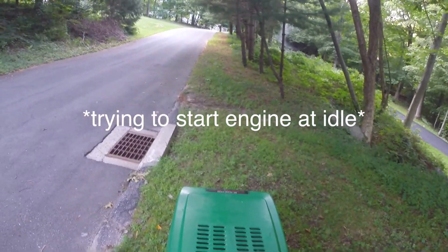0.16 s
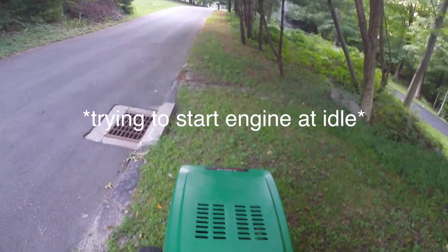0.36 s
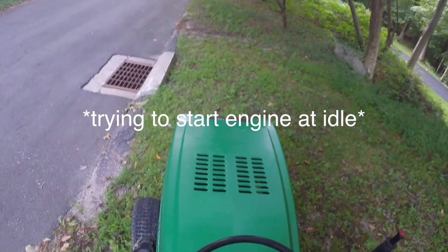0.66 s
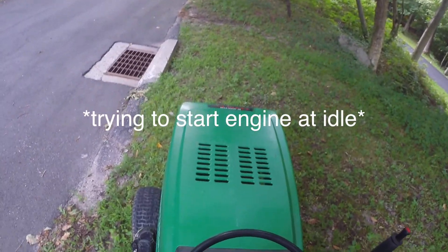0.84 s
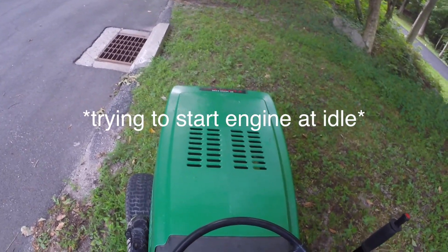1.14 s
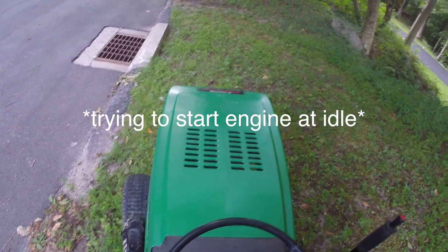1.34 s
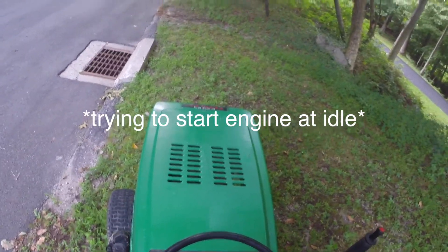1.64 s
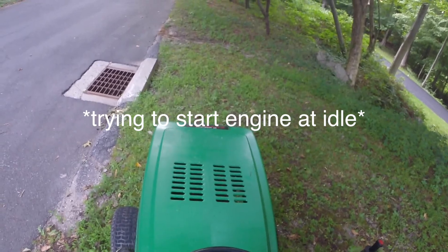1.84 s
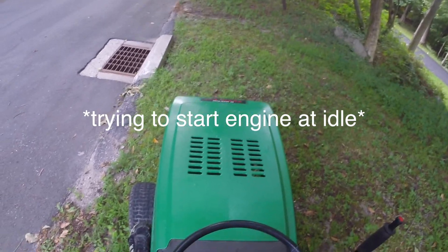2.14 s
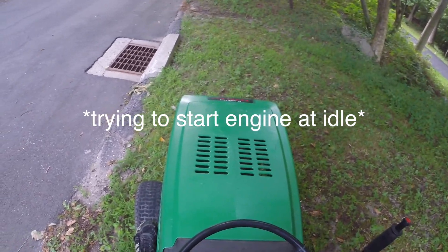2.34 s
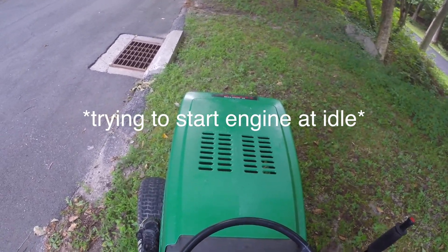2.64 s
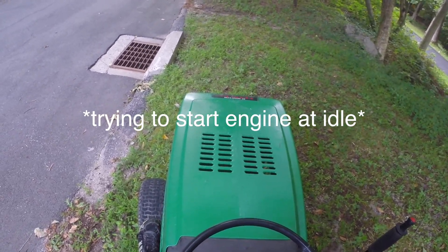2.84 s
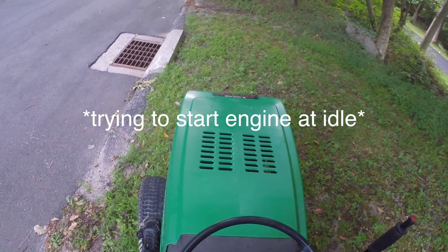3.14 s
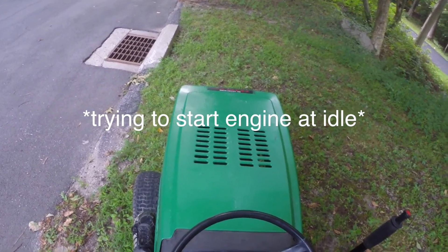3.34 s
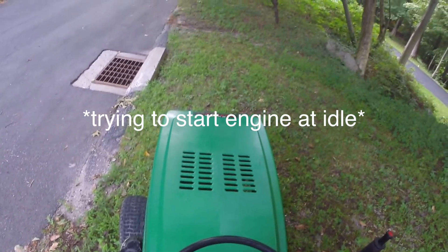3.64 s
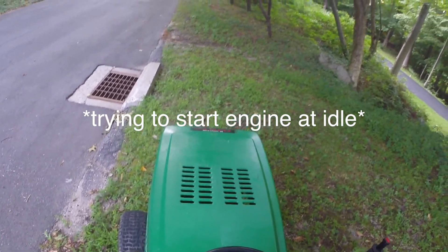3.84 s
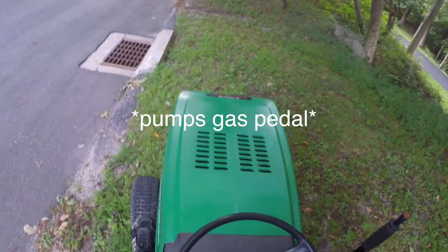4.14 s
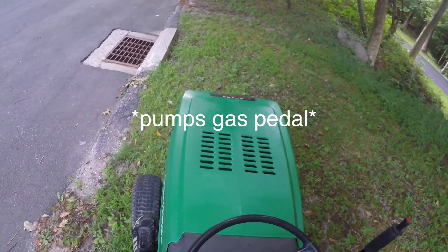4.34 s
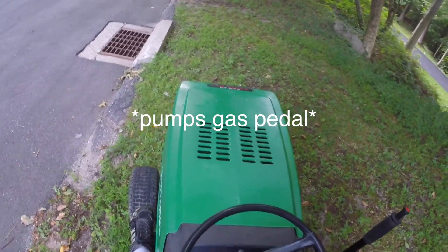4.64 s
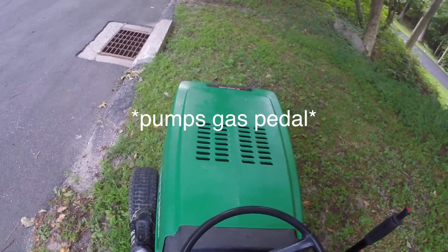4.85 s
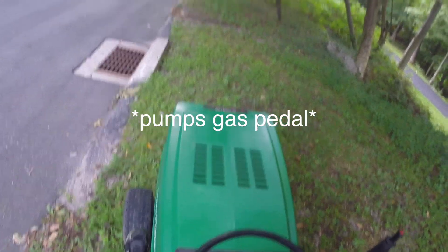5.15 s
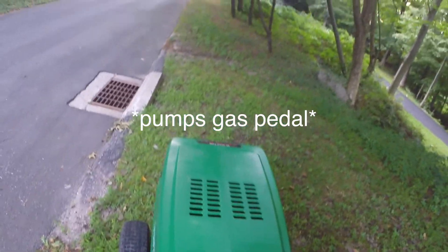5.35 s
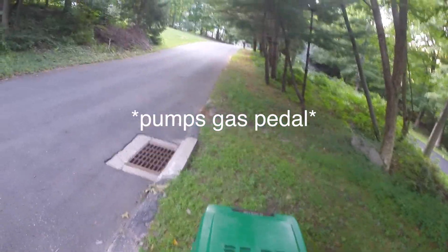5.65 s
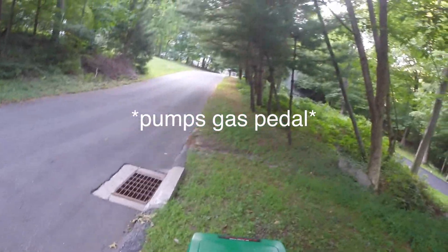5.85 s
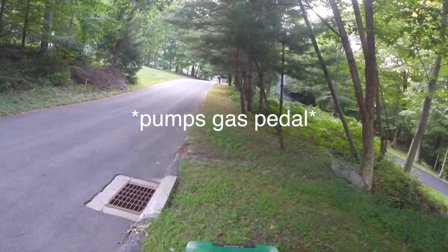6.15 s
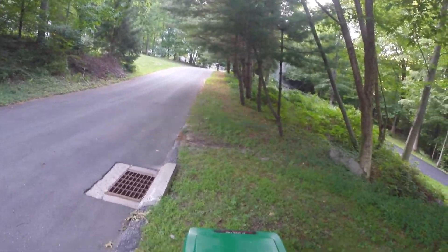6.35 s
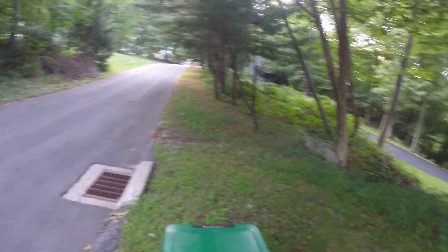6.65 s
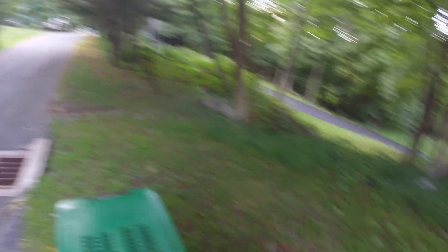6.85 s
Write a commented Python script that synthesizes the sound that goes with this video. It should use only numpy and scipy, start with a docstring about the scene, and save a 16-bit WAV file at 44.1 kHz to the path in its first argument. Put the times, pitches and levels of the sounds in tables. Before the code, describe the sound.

Heard from the seat of a lawn tractor outdoors: an engine turn with a chirp, puff and gulp dies away in soft clatter. A few clicks, then the starter bangs in with a rising whine and grinding teeth. Rhythmic chirps and hollow puffs follow, slow down briefly, then the engine catches with a clank and fires in uneven, accelerating thumps. Faint low rumble and bird behind.

```python
"""A one-cylinder lawn tractor outdoors, heard from the seat, with a faint far bird and a low rumble behind it.
First the engine turns over once, with a chirp, a puff and gulps, and its clatter dies away.
After a few clicks the starter bangs in and whines up to speed, its gear teeth and brushes made of shaped noise.
It turns the engine: each turn is a chirp of squeezed air and a ringing exhaust puff, with intake gulps between.
Then the engine catches and fires in uneven, quickening surges of thumps, muffler rings and rough gas noise."""
import sys
import numpy as np
from scipy import signal
from scipy.fft import rfft, irfft
from scipy.io import wavfile

SR = 44100
rng = np.random.default_rng(int(sys.argv[2]) if len(sys.argv) > 2 else 0)


def dump(signal):
    """Clip the signal to [-1, 1] and save it as 16-bit WAV at the path in sys.argv[1]."""
    limited = np.clip(np.atleast_2d(signal).T, -1, 1)
    pcm = np.round(limited * 32767).astype(np.int16)
    wavfile.write(sys.argv[1], SR, pcm)


N = 308700
TIME = np.arange(N) / SR  # seconds
AGE = np.arange(-SR // 50, SR // 4) / SR  # seconds since an event, from just before it


def amp(db):
    """Turns decibels into a gain."""
    return 10 ** (np.asarray(db) / 20)


def unit(x):
    """Scales a sound to an average (rms) strength of 1."""
    return x / np.sqrt(np.mean(x ** 2) + 1e-20)


def add(mix, s, sound):
    """Mixes in a sound laid out on AGE, at time s."""
    start = max(round((s + AGE[0]) * SR), 0)
    part = mix[start:][:len(sound)]
    part += sound[:len(part)]


def level(rows, column):
    """Gain over time from a column of decibels, practically silent outside its span."""
    rows = np.array(rows)
    return amp(np.interp(TIME, rows[:, 0], rows[:, column], left=-150, right=-150))


def colour(x, points):
    """Gives a sound a spectrum that falls steeply beyond its ends, with rms 1."""
    hz, db = np.transpose(points)
    f = np.fft.rfftfreq(len(x), 1 / SR) + 1  # the 1 avoids the logarithm of zero
    skirts = np.minimum(f / hz[0], 1) ** 3 * np.minimum(hz[-1] / f, 1) ** 4
    curve = amp(np.interp(np.log(f), np.log(hz), db))
    return unit(irfft(rfft(x) * skirts * curve, len(x)))


def noise(points, size=len(AGE)):
    """Makes random noise with a chosen spectrum."""
    return colour(rng.standard_normal(size), points)


def drift(rate_hz, size=N):
    """Makes a random wander of rms 1, with little movement faster than rate_hz."""
    f = np.fft.rfftfreq(size, 1 / SR)
    return unit(irfft(rfft(rng.standard_normal(size)) / (1 + (f / rate_hz) ** 4), size))


def bump(at, width):
    """One smooth swell of pressure."""
    return np.exp(-.5 * ((AGE - at) / width) ** 2)


def burst(rise, decay, delay=0):
    """Loudness shape of a blow: a quick rise and a fading tail, peak 1."""
    t = np.maximum(AGE - delay, 0)
    shape = (1 - np.exp(-t / rise)) * np.exp(-t / decay)
    return shape / shape.max()


def ring(hz, t60, delay=0):
    """A struck tone that falls by 60 dB in t60 seconds."""
    t = np.maximum(AGE - delay, 0)
    return np.sin(2 * np.pi * hz * t) * np.exp(-np.log(1000) * t / t60)


# ringing tones of the hood and frame: (pitch_hz, width_hz, level_db over the plain sound)
PANELS = [(368, 26, -7), (863, 5.8, 2.5), (942.5, 7.5, 0), (1119.5, 15, 0), (1606, 26, -1.5),
          (1876, 34, -1), (2009, 24, 2), (2800, 14, -3.5)]


def hood(x, modes=PANELS):
    """Sheet metal rings along, at its own pitches, with whatever shakes it."""
    out = x.copy()
    for hz, width, db in modes:
        out += amp(db) * signal.lfilter(*signal.iirpeak(hz, hz / width, fs=SR), x)
    return out


# spectrum of the open air: (pitch_hz, level_db relative to the other points)
AIR = [(15, -39), (25, 1), (55, -3.5), (96, -2.5), (133, 5), (152, -10), (183, -7.5), (274, -11.5),
       (4150, -33), (4870, -26), (8130, -41.5), (10100, -35.5), (10900, -47), (13500, -43), (15500, -47)]
AIR_DB = -47.5
# distant hum and high buzz: (pitch_hz, width_hz, level_db)
WHISTLES = [(135, 74, -60), (4970, 260, -72.5)]
# whistles of a far bird: (start_s, length_s, top_pitch_hz before a small waver, level_db)
BIRD = [(1.04, 0.15, 9000, -66), (1.2, .13, 8650, -65), (1.87, .1, 9850, -64), (4.918, 0.19, 8700, -59),
        (5.145, 0.14, 8650, -61.5)]
THIN_TONE_HZ, THIN_TONE_DB = 13905, -74.5


def outdoors():
    """Noise makes a low distant rumble; sines make a thin steady tone, a hum, a buzz and a far bird."""
    thin_tone = unit(np.sin(2 * np.pi * THIN_TONE_HZ * TIME + drift(4)))
    out = amp(AIR_DB) * noise(AIR, size=N) + amp(THIN_TONE_DB) * thin_tone
    for hz, width, db in WHISTLES:
        # a randomly wavering strength spreads each tone into a narrow band
        out += amp(db) * unit(drift(width / 2) * np.sin(2 * np.pi * hz * TIME))
    for s, length, hz, db in BIRD:
        arch = np.sin(np.pi * np.clip((TIME - s) / length, 0, 1))
        pitch = hz * (.94 + .06 * arch + .012 * drift(200))
        out += amp(db) * arch * np.sin(2 * np.pi * np.cumsum(pitch) / SR)
    return out


def surroundings(x, wet_db=-24, decay=0.059):
    """The ground and the trees scatter back a weak, short tail of the sound."""
    tail = noise([(100, 1.0), (600, 8.5), (3000, -8), (10000, -57)]) * burst(0.0029, decay)
    tail = tail[AGE >= 0]
    return x + amp(wet_db) * signal.oaconvolve(x, tail / np.linalg.norm(tail))[:N]


# clatter as the engine runs down and as it starts again, two lists of:
# (time_s, body_db, treble_db), both levels relative
CLATTER = [
    [(0.0, -29, -39), (0.3, -31, -47), (0.458, -41, -60), (0.62, -40.5, -71), (0.85, -75, -62)],
    [(1.97, -52, -64), (2.12, -25.5, -23), (2.35, -25.5, -28), (2.9, -21, -29.5), (3.15, -23, -34),
     (4.15, -27, -38), (4.72, -31, -45), (5.2, -24, -35), (5.5, -24.5, -31), (7.0, -25, -34)],
]
# spectra of the body and the treble: (pitch_hz, level_db relative)
BODY_COLOUR = [(150, -21.5), (250, -4.5), (370, -2.5), (520, -7.5), (720, -4), (860, -5), (1000, -7),
               (1170, -11.5), (1300, -21.5), (1700, -20.5)]
TREBLE_COLOUR = [(710, 7.5), (1200, -2), (1360, -7), (1940, -8.5), (2650, -13), (3010, -11), (3770, -12.5),
                 (4070, -13.5), (5090, -21.5), (5790, -28), (6730, -25.5), (7250, -28), (8330, -35.5),
                 (14400, -53), (15500, -57)]


def clatter(taps_per_s=200, spread_db=1.0, flutter_db=1.5):
    """Valve gear, belt and loose panels: uneven random taps, each a brief burst in the sheet metal."""
    strength_db = spread_db * np.minimum(rng.exponential(1, N), 3)
    energy = (rng.random(N) < taps_per_s / SR) * amp(strength_db) ** 2
    wash = .4  # steady noise between the taps

    def taps(decay):
        """Noise that swells with every tap and fades after it."""
        power = signal.oaconvolve(energy, burst(0.00029, decay)[AGE >= 0] ** 2)[:N]
        envelope = unit(np.sqrt(abs(power)))
        return (envelope + wash) * rng.standard_normal(N)

    body = colour(taps(0.012), BODY_COLOUR) * sum(level(rows, column=1) for rows in CLATTER)
    treble = colour(taps(0.013), TREBLE_COLOUR) * sum(level(rows, column=2) for rows in CLATTER)
    return hood(amp(-4.5) * body + amp(2.0) * treble) * amp(flutter_db * drift(16.3))


# clicks of the controls and clanks of the drive:
# (start_s, body_db, treble_db, decay_s), levels relative; body and crack each scale the decay
CLANKS = [(0.114, -15, -44, 0.0051), (0.303, -18, -37, 0.0054), (0.461, -23.5, -52, 0.026),
          (0.493, -30, -39, 0.0093), (0.528, -17.5, -54, 0.015), (1.205, -29, -39, 0.023),
          (1.489, -20, -33.5, 0.0076), (1.552, -25, -38.5, 0.0054), (1.61, -28.5, -67, 0.0029),
          (1.849, -59, -47.5, 0.011), (1.95, -13.5, -33, 0.033), (1.976, -2, -21.5, 0.031),
          (2.058, -8, -49, 0.11), (3.062, -6.5, -27, 0.0085), (4.338, -34, -36, 0.008),
          (4.695, -14, -54, 0.0068), (4.727, -12.5, -54, 0.011), (4.916, -12, -44, 0.016),
          (5.033, -21, -36, 0.03), (5.478, 2.5, -36, 0.011), (5.583, -7.5, -31, 0.018),
          (6.105, -5, -34, 0.015)]
# spectra of struck metal and of bright hiss: (pitch_hz, level_db relative)
CLANK_COLOUR = [(150, -29), (250, -1), (350, -3.5), (550, -2), (720, 3), (1130, -1.5), (1350, -10),
                (2150, -16), (3200, -23.5)]
HISS_COLOUR = [(900, -2), (2000, 5.5), (3200, 2.5), (4100, 0), (5200, -7.5), (7200, -5.5), (9000, -17.5),
               (15000, -28.5)]


def clanks():
    """Metal meets metal: two noise bursts, a bright crack and a longer body, ring the frame."""
    out = np.zeros(N)
    for s, body_db, treble_db, decay in CLANKS:
        body = amp(body_db - 11.5) * noise(CLANK_COLOUR) * burst(0.0006, 1.5 * decay)
        crack = amp(treble_db - 2.0) * noise(HISS_COLOUR) * burst(0.00096, .5 * decay)
        add(out, s, body + crack)
    return hood(out)


# the starter takes up the load and shakes the frame: (start_s, level_db, decay_s)
ENGAGE = [(1.981, -13.5, 0.038)]
# spectrum of the shaken frame: (pitch_hz, level_db relative)
FRAME_COLOUR = [(120, -8.5), (250, -3.5), (350, 0.5), (450, -1), (540, 4), (700, -10)]


def engage():
    """A burst of low noise: a dull, heavy shudder of the frame."""
    out = np.zeros(N)
    for s, db, decay in ENGAGE:
        add(out, s, amp(db) * noise(FRAME_COLOUR) * burst(0.0028, decay))
    return out


# thin metal that rings at the first firing: (pitch_hz, width_hz, level_db)
SHIMMER = [(7050, 1100, -28.5), (12000, 760, -52)]
CATCH_S = 5.478


def ping(decay=0.016):
    """A short, bright shimmer of thin metal as the engine catches: narrow bands that fade at once."""
    out = np.zeros(N)
    for hz, width, db in SHIMMER:
        shimmer = drift(width / 2, size=len(AGE)) * np.sin(2 * np.pi * hz * AGE)
        add(out, CATCH_S, amp(db) * shimmer * burst(0.00071, decay))
    return out


# the starter winds up from its first pitch towards its top pitch; it fades once the key is let go
START_S, RELEASE_S = 1.98, 2.97
START_HZ, TOP_HZ, WIND_UP_S = 200, 1278, .5
WHINE_DB, WHINE_FALL_DB_PER_S = -22, 170  # base level, before load, torque and colour
TORQUE_DB = 7.5  # extra whine towards standstill, where the motor pulls hardest
PARTIALS_DB = [0.5, -3, -11, -12]  # the tooth note and its multiples: level_db relative
SLACK_FROM_HZ, SLACK_FULL_HZ = 800, 1000  # pitches between which the teeth begin to rattle
# the whine swells as the piston is pushed into each compression
LOAD_DB, LOAD_LEAD_S, LOAD_WIDTH_S = 3.5, 0.022, 0.028
FIRST_PUSH_S = 2.16  # the first, slow compression, too gentle to chirp
BRUSH_DB, BRUSH_DB_PER_OCTAVE = -24.5, 12.5  # at top speed, and how it follows the speed
BRUSH_FALL_DB_PER_S = 200
# the pinion grinds hardest while it drags the engine up to speed
GRIND_DB, GRIND_S, GRIND_RISE_S, GRIND_DECAY_S = -28.5, 2.12, 0.032, 0.39
# how well the starter radiates its whine: (pitch_hz, level_db)
WHINE_COLOUR = [(300, -31), (520, -19), (660, -6.5), (780, 6.5), (880, -7.5), (950, -4), (1100, -4.5),
                (1320, 3.5), (1450, -6.5), (1630, -4.5), (2000, -18), (2500, -27)]
# spectra of the grinding pinion and the brushes: (pitch_hz, level_db relative)
GRIND_COLOUR = [(750, -5), (1300, 7), (1950, 3), (2500, 0.5), (4100, -12), (5200, -13), (7500, -41),
                (12000, -61)]
BRUSH_COLOUR = [(760, -5.5), (1300, -2.5), (1460, -6), (2010, -9.5), (2600, -15.5), (2770, -14),
                (3240, -13.5), (3980, -13), (4700, -16.5), (7740, -18), (11100, -33.5), (12700, -43),
                (15500, -45)]
# ringing tones of the starter's housing: (pitch_hz, width_hz, level_db over the plain sound)
HOUSING = [(2770, 40, 3), (2970, 37, 2), (3970, 33, 7.5), (4380, 46, -4), (5730, 28, 7), (6430, 51, 5),
           (6850, 51, -14), (7650, 53, 2)]
# unfired turns, played here as load and in cranking() as sound: (compression_s, exhaust_opens_s)
# the shorter the gap, the faster and louder the turn
TURNS = [(0.185, 0.243), (2.384, 2.426), (2.606, 2.642), (2.801, 2.835), (2.982, 3.015), (3.17, 3.21),
         (3.348, 3.379), (3.515, 3.547), (3.702, 3.739), (3.887, 3.919), (4.06, 4.092), (4.252, 4.293),
         (4.496, 4.549), (4.808, 4.873), (5.092, 5.136), (5.29, 5.323)]


def starter(grind_db=-8):
    """A motor's rising whine, shaken by uneven gear teeth, over the hiss of brushes and belt."""
    grain_db = 2.2  # roughness of the brush hiss
    driven = np.maximum(TIME - START_S, 0)
    coasting = np.clip(TIME - RELEASE_S, 0, 1)
    pitch = TOP_HZ + (START_HZ - TOP_HZ) * np.exp(-driven / WIND_UP_S)

    # the teeth run cleaner while pressed home, and rattle once the engine is up to speed
    slack = np.interp(pitch, [SLACK_FROM_HZ, SLACK_FULL_HZ], [0, 1])
    waver = .008 + .022 * slack
    rough = .2 + .4 * slack
    pushes = [FIRST_PUSH_S] + [s for s, _ in TURNS]
    load = sum(np.exp(-.5 * ((TIME - s + LOAD_LEAD_S) / LOAD_WIDTH_S) ** 2) for s in pushes)
    drive = (driven > 0) * amp(-WHINE_FALL_DB_PER_S * coasting)

    phase = 2 * np.pi * np.cumsum(pitch * (1 + waver * drift(133))) / SR
    whine = np.zeros(N)
    for k, db in enumerate(PARTIALS_DB, 1):
        radiated_db = np.interp(k * pitch, *np.transpose(WHINE_COLOUR))
        whine += amp(db + radiated_db) * np.sin(k * phase) * (1 + rough * drift(38))
    whine *= drive * amp(WHINE_DB + LOAD_DB * load + TORQUE_DB * (1 - pitch / TOP_HZ))

    # the wobbling shaft puts sidebands round the tooth note
    shaft = phase / 6  # six teeth a turn
    wobble = 2 * rough * sum(drift(50) * np.cos(k * shaft) / np.sqrt(k) for k in (1, 2, 3))
    teeth = (1 + np.cos(shaft)) ** 2 / 2  # the scraping comes in a burst every turn
    strain = np.exp(np.minimum((TIME - GRIND_S) / GRIND_RISE_S, (GRIND_S - TIME) / GRIND_DECAY_S))
    scrape = amp(GRIND_DB) * drive * strain * noise(GRIND_COLOUR, size=N) * teeth

    speed_db = BRUSH_DB_PER_OCTAVE * np.log2(pitch / TOP_HZ)
    brushes = (driven > 0) * amp(BRUSH_DB + speed_db - BRUSH_FALL_DB_PER_S * coasting)
    rub = noise(BRUSH_COLOUR, size=N) * brushes * amp(grain_db * drift(260))
    return whine * (1 + amp(grind_db) * wobble) + hood(hood(scrape + rub), HOUSING)


# intake gulps: (start_s, level_db relative, direction of the pressure swing, +1 or -1)
GULPS = [(0.051, -9.5, 1), (0.383, -19, 1), (2.134, -20.5, -1), (2.255, -10.5, 1), (2.504, -7, 1),
         (2.712, -6.5, 1), (2.899, -7.1, 1), (3.078, -7.5, 1), (3.27, -5, -1), (3.436, -3.5, -1),
         (3.611, -7, 1), (3.805, -5.0, -1), (3.978, -3, -1), (4.158, -6.5, 1), (4.373, -9, 1),
         (4.65, -24, 1), (4.977, -13.5, -1), (5.208, -6, -1), (5.377, -1, -1)]
# spectra of gear teeth under load and of the valve gear: (pitch_hz, level_db relative)
GEAR_COLOUR = [(350, -21), (600, -8.5), (820, 4.5), (1150, 2), (1350, -11), (2200, -5.5), (2800, -27),
               (4500, -31)]
VALVE_COLOUR = [(1500, 4), (2400, -0.5), (3100, 1), (3600, 0), (4080, 4.5), (4600, -8), (5400, -11.5),
                (7000, -11.5), (9000, -24.5), (15000, -32)]
# ringing tones of the valve cover: (pitch_hz, width_hz, level_db over the plain sound)
VALVE_COVER = [(3990, 51, 1), (6460, 90, 4)]
BRISK_GAP_S = .032  # from compression to open exhaust valve in a brisk turn
CHIRP_DB, KNOCK_DB, PUFF_DB, VALVE_DB = -19.5, -5.5, -5.5, -31  # relative, in a brisk turn
CHIRP_SAG_DB, PUFF_SAG_DB = 6, 7.5  # lost when the gap is twice as long
PEDAL_S, PEDAL_KNOCK_DB = 4.4, -20  # once the pedal is pumped the knock all but goes


def cranking(valve_decay=0.02):
    """The unfired strokes: air chirps past a valve, puffs out of the pipe and is gulped in again."""
    air, metal, valves = np.zeros((3, N))
    for s, opens in TURNS:
        slowness = np.log2((opens - s) / BRISK_GAP_S)
        chirp_db = CHIRP_DB - CHIRP_SAG_DB * slowness
        knock_db = KNOCK_DB - PUFF_SAG_DB * slowness + PEDAL_KNOCK_DB * (s > PEDAL_S)

        # the note starts sharply, sinks as the piston slows and stops at the top of the stroke
        sinking_hz = 612 + 115 * np.exp(-np.maximum(AGE, 0) / .007)
        hz = sinking_hz * (rng.normal(1, .015) + .025 * drift(200, size=len(AGE)))
        squeeze = burst(.001, .022, delay=-.003) * np.exp(-(AGE / .019) ** 6)
        chirp = 2.0 * np.sin(2 * np.pi * (np.cumsum(hz) / SR + rng.random())) * squeeze
        gears = .48 * noise(GEAR_COLOUR) * burst(.0005, .017, delay=-.003)
        knock = 1.0 * bump(0, 0.00094) - .5 * bump(0.001, 0.0018) + 0.93 * bump(0.01101, 0.00065)
        add(air, s, amp(chirp_db) * chirp + 1.14 * amp(knock_db) * knock)
        add(metal, s, amp(chirp_db) * gears)

        # the exhaust valve opens: a sharp drop, then the pipe rings
        force = amp(-PUFF_SAG_DB * slowness)
        pipe = 0.54 * ring(305 * rng.normal(1, 0.0059), 0.083, delay=0.0014)
        pipe += 0.36 * ring(133, 0.052, delay=0.00222)
        add(air, opens, force * amp(PUFF_DB) * (pipe - 0.9 * bump(0, 0.00061)))
        tick = noise(VALVE_COLOUR) * burst(0.0012, valve_decay, delay=-0.0042)
        add(valves, opens, force * amp(VALVE_DB) * tick)

    for s, db, direction in GULPS:
        swing = 1.33 * bump(0, 0.0012) - .5 * bump(-0.0029, 0.0023) - 0.23 * bump(0.0018, 0.0018)
        slow = np.clip((-9.5 - db) / 8, 0, 1)  # a slow, weak gulp leaves the intake open and humming
        hum = (0.083 + 0.39 * slow) * ring(96, 0.058 + 0.11 * slow, delay=0.0037)
        add(air, s, amp(db) * direction * (swing - hum))
        # the drive goes slack and rattles
        add(metal, s, 0.049 * amp(db) * noise(GEAR_COLOUR) * bump(0.054, 0.011))
    return air + hood(metal) + hood(valves, VALVE_COVER)


# cycles of the running engine: (start_s, thump_db relative, burn from 0 = misfire to 1 = full)
CYCLES = [(5.505, -3, 0.56), (5.601, -1.5, 0.63), (5.683, -3, 0.58), (5.772, -6, .3), (5.845, -1.5, 0.86),
          (5.917, 0, 0.56), (5.989, -4.5, 0), (6.058, -1.5, 0.28), (6.116, -3, 0.95), (6.178, -2, 0.96),
          (6.232, -1, 0.72), (6.293, -7, 0.42), (6.345, -2.5, 0.29), (6.392, -3, 0.97), (6.443, -4, 0.94),
          (6.491, -3, .92), (6.537, -5, 0.61), (6.588, -4, 0.17), (6.632, -4, 0), (6.675, -3, 0),
          (6.721, -2.5, 0.25), (6.763, -2, .88), (6.806, -1.5, 0.73), (6.848, -4, 0.81), (6.89, -8, 0.36),
          (6.933, -3.5, 0), (6.976, -2, 0.29)]
# tones of muffler and air box: (pitch_hz, level_db relative, base t60_s that the burn scales)
MUFFLER = [(248.4, -0.5, 0.16), (301, -2.5, 0.11), (201, -24, 0.069), (131, 3.5, 0.07)]
# spectrum of turbulent gas in the muffler: (pitch_hz, level_db relative)
BLAST_COLOUR = [(120, -26), (200, 0), (260, 0.5), (330, 0), (420, -10), (560, -11.5)]
MISFIRE_RING_DB, BURN_RING_DB = -21.5, 15  # drive of the muffler in a misfire, and what a full burn adds
MISFIRE_HISS_DB, BURN_HISS_DB = -44, 13  # the same for the exhaust hiss


def running(lag=0.01367, rasp=0.25, churn=0.49):
    """Every cycle thumps, knocks and blasts through the muffler; a fuller burn blasts louder and longer."""
    air, metal = np.zeros((2, N))
    for s, thump_db, burn in CYCLES:
        ring_db = MISFIRE_RING_DB + BURN_RING_DB * burn
        hiss_db = MISFIRE_HISS_DB + BURN_HISS_DB * burn

        suck = -1.1 * bump(-0.000067, 0.00057) + 0.98 * bump(0.0026, 0.00079)
        rebound = 1.0 * bump(0.00608, 0.0011) - 0.85 * bump(0.008, 0.0011) - .5 * bump(0.01157, 0.00068)
        thump = suck + (1 - 0.44 * burn) * rebound

        delay = lag + rng.normal(0, 0.00085)
        muffler = np.zeros(len(AGE))
        for hz, db, t60 in MUFFLER:
            muffler -= amp(db) * ring(hz * rng.normal(1, 0.044), t60 * (.5 + 0.74 * burn), delay)
        gas = churn * noise(BLAST_COLOUR) * burst(0.0029, 0.029, delay=-0.013)
        blast = (0.28 + 0.41 * burn) * muffler + gas
        hiss = noise(HISS_COLOUR) * burst(0.0019, 0.045, delay=-0.0015)
        add(air, s, amp(thump_db - 4.5) * thump + amp(ring_db) * blast + amp(hiss_db) * hiss)

        knock = noise(CLANK_COLOUR) * burst(0.0025, .025, delay=-0.0059)
        add(metal, s, rasp * amp(ring_db - 1) * knock)
    return air + hood(metal)


def scene():
    """The tractor in the open air."""
    tractor = clatter() + clanks() + engage() + ping() + starter() + cranking() + running()
    return (outdoors() + surroundings(tractor))[None]


EDGE_HZ = 15450  # upper end of the band


def record(dry, low_hz=28):
    """The microphone sheds the deepest bass, peaks are rounded off, and the band ends."""
    x = signal.sosfilt(signal.butter(2, low_hz, "highpass", fs=SR, output="sos"), dry)
    x = x / (1 + (x / .9) ** 6) ** (1 / 6)  # peaks bend towards .9
    lowpass = signal.firwin(511, EDGE_HZ, window=("kaiser", 9), fs=SR)
    return signal.oaconvolve(x, lowpass[None], "same")


dry = scene()
out = record(dry)
dump(out)
```